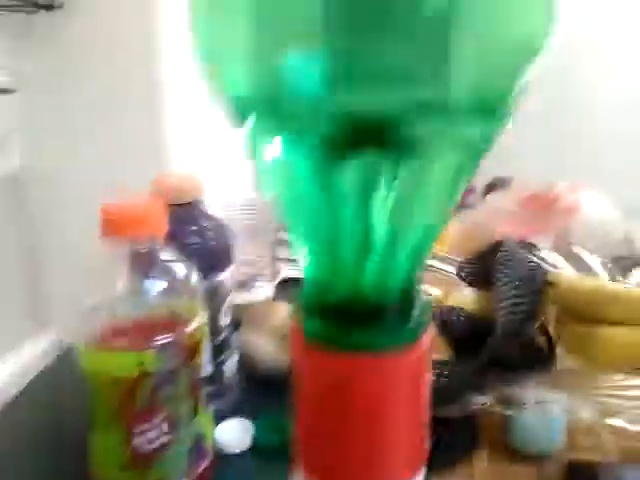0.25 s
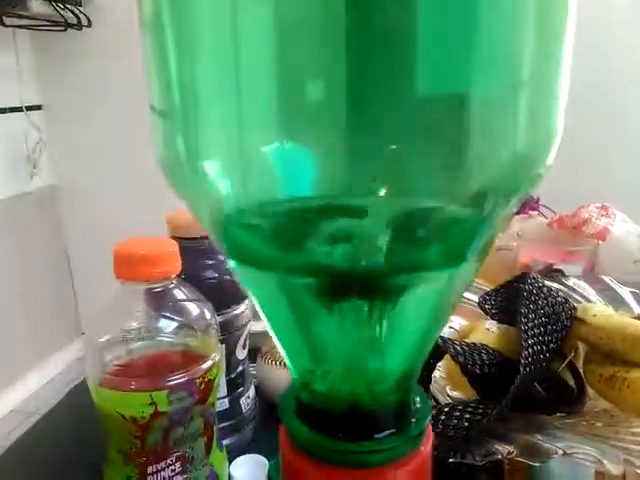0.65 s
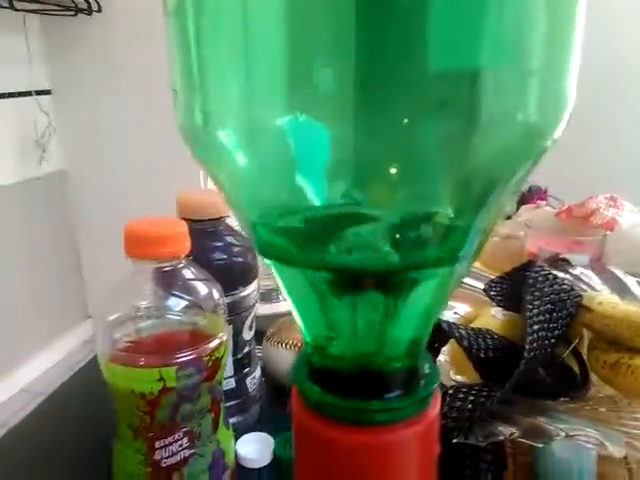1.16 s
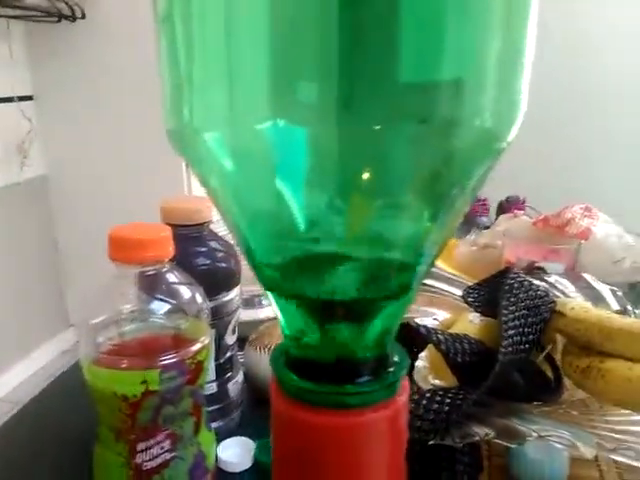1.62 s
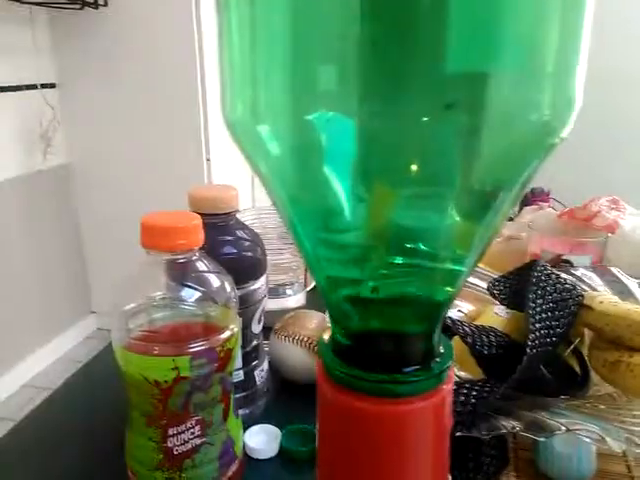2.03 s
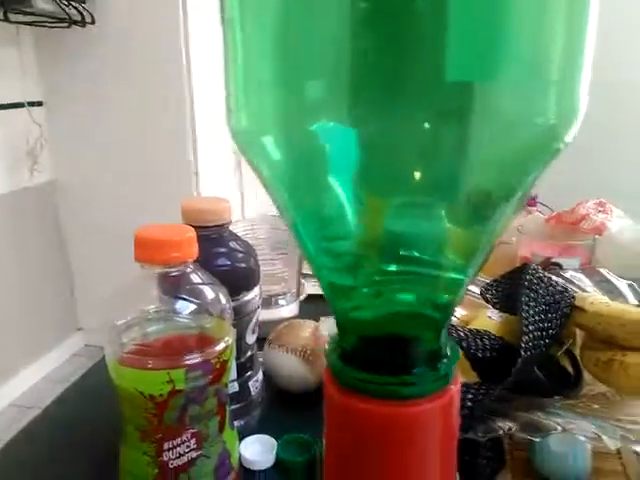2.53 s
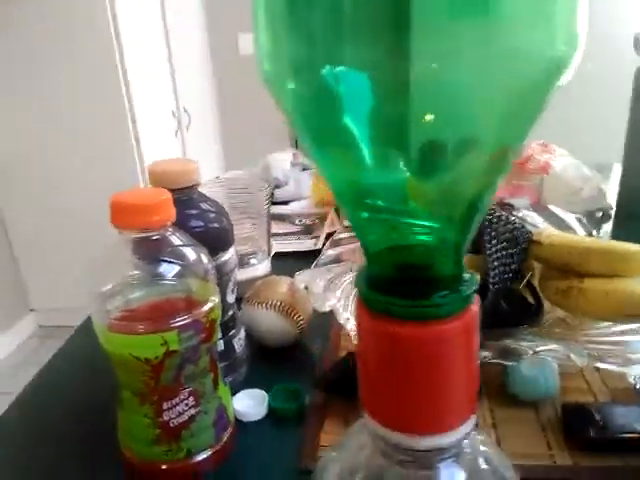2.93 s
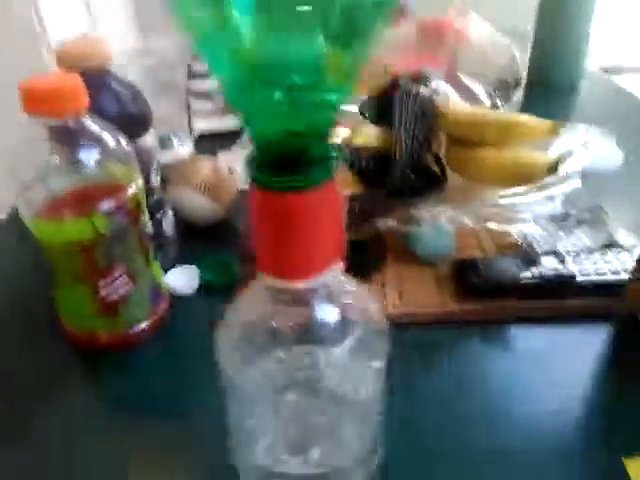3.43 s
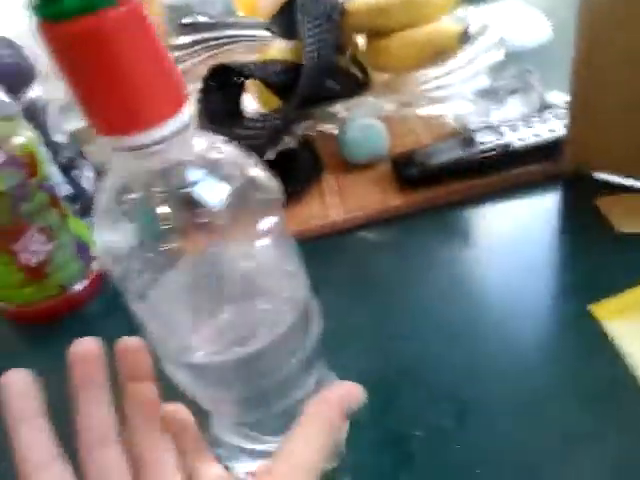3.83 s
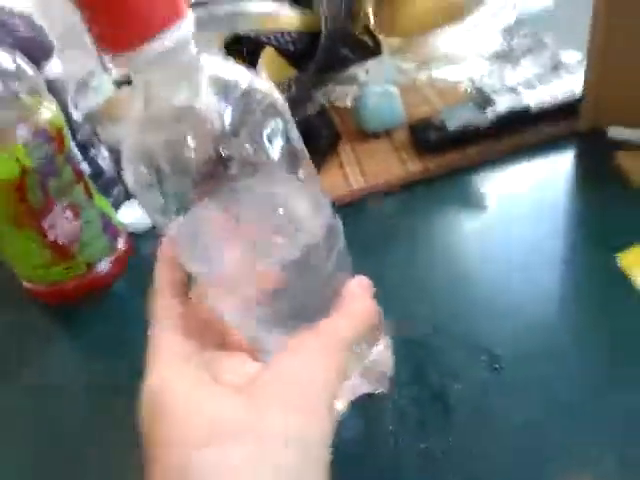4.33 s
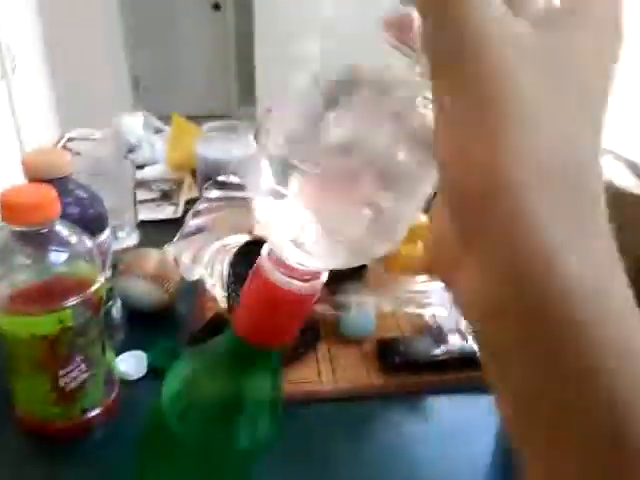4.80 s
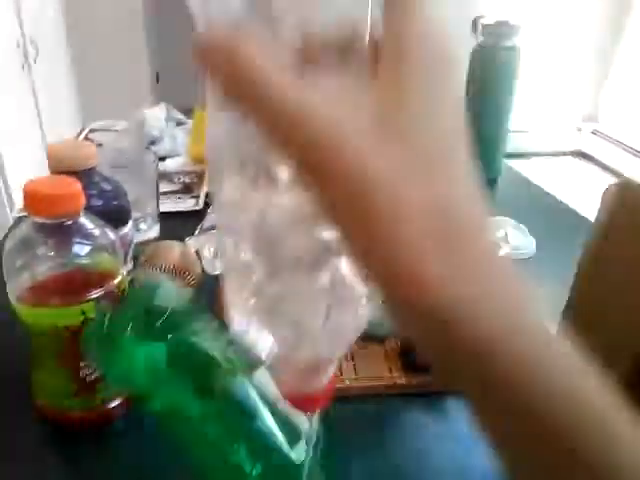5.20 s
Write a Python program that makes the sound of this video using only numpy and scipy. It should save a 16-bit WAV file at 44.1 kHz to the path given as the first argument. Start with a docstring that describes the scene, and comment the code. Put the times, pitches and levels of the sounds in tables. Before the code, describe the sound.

Close stereo sound in a small room: the last water drains between two plastic bottles in irregular bubbly plinks and sharp little drips over a thinning trickle. It dies to near silence with soft rubbing, a low microphone bump and faint crinkles. Then the tipped bottles hit the table with a loud hollow thud, rattle quickly and bounce again while water sloshes.

```python
"""Water draining between bottles, then a fall

The last water swirls through a connector from one plastic bottle into another: trapped bubbles plink as
rising, dying sines, drops tick as bursts of wall modes and the trickle is a cloud of tiny resonances.
The pair is tipped, with rubbing, crinkling and swaying water, and topples onto a table: noise bursts and
decaying modes make a hollow thud, a crack and ringing bounces, while filtered grains slosh and splash.
A small room answers with diffuse echoes, over room tone, a low rumble and a faint mains hum."""
import sys
import numpy as np
from scipy import signal
from scipy.fft import rfft, irfft, next_fast_len
from scipy.io import wavfile

SR = 44100
rng = np.random.default_rng(int(sys.argv[2]) if len(sys.argv) > 2 else 0)


def wav_record(signal):
    """Record a signal, one row per channel, as 16-bit PCM in the file named by sys.argv[1]."""
    frames = np.transpose(np.atleast_2d(signal))
    bounded = np.clip(frames, -1, 1)
    # unit amplitude maps onto the largest positive 16-bit level
    quanta = np.round(bounded * 32767).astype(np.int16)
    wavfile.write(sys.argv[1], SR, quanta)


N = 240948
TIME = np.arange(N) / SR  # s

# Many levels are relative: the functions that play them may add trims.

# dwindling stream: start_s, gurgle_db, spray_db
STREAM_LEVELS = [(0.0, -50, -51.5), (0.23, -63, -55), (0.52, -71, -66.5), (0.89, -63, -57.5),
                 (1.08, -56, -63), (1.86, -68, -63), (2.1, -62, -60), (2.28, -71.5, -62), (2.55, -82, -83)]
# spectrum of the gurgling bubbles: frequency_hz, density_db (per Hz)
GURGLE_SPECTRUM = [(250, -6), (550, -23), (850, 17.5), (1450, -1), (1800, 3.5), (3000, 15.5), (4200, -43),
                   (7000, -47)]
# spectrum of the fine spray: frequency_hz, density_db (per Hz)
SPRAY_SPECTRUM = [(2200, -7.5), (3600, -5), (4200, -13), (5500, 3), (6600, -7), (7700, -2.5), (8800, -4),
                  (10100, -11), (14000, -10)]
# air resonances in the lower bottle: frequency_hz, level_db, t60_s
AIR_MODES = [(300, -8, .2), (494, -20, .15), (865, 4, 0.089), (1003, 8, 0.046), (1188, 4.5, 0.04),
             (1450, -16, 0.024), (1483, 6, 0.057), (1900, 0, 0.041), (2390, -7, 0.072), (2910, -10, 0.18)]


def draining(spatter_db=-5, cavity_db=-46):
    """Cavity resonance: bubbles and drops excite the air of the lower bottle, over a fine trickle."""
    gurgle, spray = gains(STREAM_LEVELS)
    plinks = bubbles() + ticks(drops(), level_db=-0.5, t60=0.025, width=0.063, snap_db=-15.5)
    air = sum(from_db(db + cavity_db) * ring(plinks, hz, t60) for hz, db, t60 in AIR_MODES)
    gurgling = fizz(per_s=350, size_db=2.0, low_hz=428.7, high_hz=4106, cycles=97)
    spraying = fizz(per_s=450, size_db=4.5, low_hz=3460, high_hz=13960, cycles=55)
    spatter = grains(per_s=570, size_db=0.0)
    trickle = gurgle * coloured(gurgling, GURGLE_SPECTRUM)
    trickle += spray * coloured(spraying, SPRAY_SPECTRUM)
    trickle += from_db(spatter_db) * spray * coloured(spatter, SPRAY_SPECTRUM)
    walls = [(300, -12.5), (1400, -8.5), (3000, -16), (4000, -5.5), (5400, -14.5), (12000, -6)]
    return plinks + air + trickle + echo(plinks + trickle, walls, low_t60=0.4, high_t60=0.43)


# bubbles trapped in the pool: start_s, level_db, pitch_hz (at onset), splat_db (re the bubble)
BUBBLE_EVENTS = [(0.01, -40.5, 1850, 4.5), (0.049, -40, 1113, -14), (0.087, -31.5, 3360, -5),
                 (0.109, -33, 1020, -8), (0.131, -31.5, 2370, -3), (0.181, -39, 1036, -3),
                 (0.317, -42.5, 1430, -2), (0.383, -39.5, 1500, -6), (0.429, -40.5, 1180, -10),
                 (0.486, -39, 1780, -8), (0.575, -34, 1460, -18), (0.62, -27, 2965, -4),
                 (0.682, -31.5, 1845, -7), (0.768, -39.5, 1000, -6), (0.816, -37, 1490, -7),
                 (0.847, -33.5, 1390, -15), (0.898, -41.5, 1450, -8), (1.024, -29, 1590, -5),
                 (1.04, -38.5, 1350, -3), (1.12, -32, 2640, -7.5), (1.154, -38.5, 1406, -3),
                 (1.21, -40, 1430, -2), (1.401, -44, 1210, -12), (1.485, -35.5, 1520, 2.5),
                 (1.535, -32.5, 3160, 1), (1.556, -35.5, 1443, -2), (1.832, -41.5, 3800, -7),
                 (1.894, -37, 1010, -14), (1.94, -50, 873, 7), (2.02, -31.5, 1470, -6),
                 (2.074, -33, 1150, -25), (2.167, -36, 3110, -14), (2.222, -48.5, 856, 3),
                 (2.272, -38, 875, -20), (2.814, -61, 906, 6)]
SINGLE_DRIPS_S = 1.88  # from here on the bubbles come as single drips, without droplets of their own
BUBBLE_T60_S = 0.021


def bubbles(level_db=-1, droplet_splat_db=-5, splat_t60=0.016, side_db=-6,
            satellite_db=-14, scatter_octaves=0.394, satellite_s=0.016):
    """Bubble resonance: a drop splats and traps ringing air; fainter satellites follow at other pitches."""
    out, t = np.zeros((2, N)), np.arange(SR // 10) / SR
    splashing = [row for row in BUBBLE_EVENTS if row[0] < SINGLE_DRIPS_S]
    droplets = fallback(splashing, count=1, low_hz=1195, high_hz=3340,
                        soonest_s=0.00302, latest_s=0.035, weaker_db=7, spread_db=2.5)
    for s, db, hz, splat_db in list(BUBBLE_EVENTS) + [(*row, droplet_splat_db) for row in droplets]:
        gain = from_db(db + level_db) * pan(side_db)
        # the broad, dull splat loses its depth as the stream thins to single drips
        depth_hz = np.interp(s, [1.5, SINGLE_DRIPS_S], [220, 850])
        skirts = signal.butter(1, [hz * 0.55, hz * 1.64], "band", fs=SR, output="sos")
        noise = rng.standard_normal((2, len(t))) * fade(t, splat_t60)
        splat = band(signal.sosfilt(skirts, noise), depth_hz, 4700)
        splat = from_db(splat_db) * splat / abs(splat).max()
        add(out, s, gain * (plink(t, hz, BUBBLE_T60_S) + splat))
        # three satellites
        for late, octaves in zip(rng.random(3), rng.standard_normal(3).clip(-2, 2)):
            satellite = plink(t, hz * 2 ** (scatter_octaves * octaves), BUBBLE_T60_S)
            add(out, s + late * satellite_s, gain * from_db(satellite_db) * satellite)
    return nearer_right(out)


def plink(t, hz, t60, rise_per_s=3.6, attack_s=0.0012):
    """Bubble near a surface: a dying note whose pitch climbs as it nears the surface; peak 1."""
    cycles = hz * (t + rise_per_s * t * t / 2)
    note = np.sin(2 * np.pi * cycles) * fade(t, t60) * (1 - np.exp(-t / attack_s))
    return note / abs(note).max()


# drops on the thin wall: start_s, level_db, pitch_hz
DROP_EVENTS = [(0.0395, -40, 6260), (0.192, -40.5, 4620), (0.227, -33.5, 5530), (0.3002, -43.5, 5840),
               (0.3853, -39.5, 4850), (0.5177, -45, 7600), (0.5941, -35.5, 8200), (0.6467, -35.5, 5070),
               (0.7356, -37.5, 5000), (0.8415, -30, 7860), (0.899, -38, 5730), (0.9911, -34.5, 5060),
               (1.0231, -37, 7460), (1.2705, -41.5, 4270), (1.3068, -39, 5290), (1.3435, -39.5, 5700),
               (1.4346, -33.5, 5820), (1.5802, -37.5, 5620), (1.6354, -41, 5530), (1.737, -40, 4560),
               (1.7954, -40, 5580), (1.9667, -36.5, 7640), (2.003, -41, 6200), (2.125, -45, 6000),
               (2.2779, -37.5, 5580), (2.3384, -42, 5830), (2.407, -41.5, 7390), (2.4361, -40.5, 5100),
               (2.6803, -45.5, 5050)]
# each wall mode radiates its own way: pitch_hz, left_right_db
WALL_DIRECTIONS = [(4800, -1.5), (5650, 7), (7400, -8.5)]


def drops():
    """Modal radiation: drops and droplets placed by pitch, as start_s, level_db, pitch_hz, left_right_db."""
    droplets = fallback(DROP_EVENTS, count=1, low_hz=5020, high_hz=9200,
                        soonest_s=0.0036, latest_s=0.03, weaker_db=9.5, spread_db=6)
    return [(s, db, hz, at_hz(WALL_DIRECTIONS, hz)) for s, db, hz in list(DROP_EVENTS) + droplets]


def fallback(parents, count, low_hz, high_hz, soonest_s, latest_s, weaker_db, spread_db):
    """Ballistic droplets fall back a moment later at any pitch, as start_s, level_db, pitch_hz."""
    s, db = np.repeat(np.array(parents)[:, :2], count, axis=0).T
    late, size, pitch = rng.random((len(s), 3)).T
    start_s = s + soonest_s + (latest_s - soonest_s) * late
    level_db = db - weaker_db + spread_db * (2 * size - 1)
    return list(zip(start_s, level_db, low_hz * (high_hz / low_hz) ** pitch))


def ticks(rows, level_db, t60, width, snap_db):
    """Impact excitation: each tap shakes a narrow cluster of wall modes and gives a broad snap."""
    out, t = np.zeros((2, N)), np.arange(SR // 20) / SR
    for s, db, hz, side_db in rows:
        push = rng.standard_normal((2, len(t))) * fade(t, t60)
        cluster = band(push, hz / (1 + width), hz * (1 + width))
        snap = band(push, 1950, 8600)
        sound = cluster / cluster.std(axis=1, keepdims=True) + from_db(snap_db) * rms_one(snap)
        add(out, s, from_db(db + level_db) * pan(side_db) * sound / abs(sound.mean(axis=0)).max())
    return out


# air gulping up through the connector: start_s, level_db
GULP_EVENTS = [(.11, -51), (.31, -51), (1.024, -44.5), (1.5, -50.5)]


def gulps(low_hz=230, high_hz=760, t60=0.081, attack_s=0.003):
    """Band-limited transient: each gulp of air is a soft, dull thud in the water."""
    out, t = np.zeros((2, N)), np.arange(SR // 6) / SR
    for s, db in GULP_EVENTS:
        push = rng.standard_normal(len(t)) * fade(t, t60) * (1 - np.exp(-t / attack_s))
        thud = band(push, low_hz, high_hz)
        add(out, s, from_db(db) * thud / abs(thud).max())
    return nearer_right(out)


# low drone while the water runs: start_s, end_s, pitch_hz, level_db
DRONE_SPAN = (0.8, 2, 74.5, -63.5)


def drone(width=0.11):
    """Narrow-band noise: a soft low drone that swells and fades while the water runs."""
    start, end, hz, db = DRONE_SPAN
    gate = np.interp(TIME, [start - 0.3, start, end, end + 0.15], [0, 1, 1, 0])
    noise = band(rng.standard_normal(N), hz / (1 + width), hz * (1 + width))
    return from_db(db) * gate * rms_one(noise)


# plastic ticking as it is handled: start_s, level_db, pitch_hz, left_right_db
CRINKLE_EVENTS = [(2.927, -48.5, 14400, 3), (3.483, -54, 5300, 5), (4.2268, -45.5, 4780, 30),
                  (4.2872, -55, 1870, 1), (4.4504, -54.5, 5300, 9), (4.49, -55.5, 3400, 8),
                  (4.6357, -44.5, 4930, 3), (4.775, -37.5, 4900, 3)]
# water swaying in the tilted bottle: start_s, level_db
SWAY_LEVELS = [(3.3, -89), (3.344, -88), (3.908, -76), (3.926, -67.5), (4.14, -74), (4.75, -74)]
# spectrum of the swaying water: frequency_hz, density_db (per Hz)
SWAY_SPECTRUM = [(400, -12), (930, -4), (1060, 9.5), (1250, -4), (1850, -4), (3800, -16.5), (5200, -15),
                 (7000, -21), (14000, -44)]
# spectrum of the rubbing fingers: frequency_hz, density_db (per Hz)
RUB_SPECTRUM = [(140, -11), (290, 3), (420, -6.5), (520, -3.5), (900, -19.5), (3000, -44)]


def handling(sway_db=-1):
    """Friction and sloshing: fingers rub, the plastic ticks and water sways as the hand tilts the bottles."""
    crinkle = ticks(CRINKLE_EVENTS, level_db=-3.0, t60=0.013, width=0.16, snap_db=-11)
    sway_gain = from_db(sway_db) * gains(SWAY_LEVELS)[0] + toppling()
    sway = sway_gain * coloured(grains(per_s=4300, size_db=-3.5), SWAY_SPECTRUM)
    rub = gripping() * coloured(rng.standard_normal((2, N)), RUB_SPECTRUM)
    room = [(1000, 3.0), (6000, -2), (12000, -1)]
    return crinkle + sway + rub + echo(crinkle, room, low_t60=0.3, high_t60=0.3)


def toppling(rush_s=0.086, start_db=-70.5, rise_db=17):
    """Exponential growth: gain of the water rushing ever louder up to the first blow."""
    fallen = 1 + (TIME - BLOW_EVENTS[0][0]) / rush_s
    return ((fallen > 0) & (fallen < 1)) * from_db(start_db + rise_db * np.clip(fallen, 0, 1))


# the hand shifting the hollow bottles: start_s, end_s, level_db
GRIP_SPANS = [(0, 0.346, -69), (2.723, 4.85, -76.5)]


def gripping(holding_db=-79, fade_s=0.13, uneven_db=2.5):
    """Amplitude modulation: gain of rubbing, faint while the hand holds, louder while it shifts, uneven."""
    moves = 0
    for start, end, db in GRIP_SPANS:
        moves = moves + from_db(db) * np.interp(TIME, [start - fade_s, start, end, end + fade_s], [0, 1, 1, 0])
    uneven = np.interp(TIME, np.arange(90) / 15, rng.standard_normal(90))  # 15 knots a second
    return (from_db(holding_db) + moves) * from_db(uneven_db * uneven)


# finger sliding on the wall: start_s, end_s, pitch_hz, level_db
SQUEAK_SPAN = (3.92, 4.05, 1075, -69)


def squeak(width=0.05, fade_s=0.02):
    """Friction-driven resonance: a sliding finger sings near the bottle's hollow note, as narrow noise."""
    start, end, hz, db = SQUEAK_SPAN
    gate = np.interp(TIME, [start - fade_s, start, end, end + fade_s], [0, 1, 1, 0])
    noise = band(rng.standard_normal((2, N)), hz / (1 + width), hz * (1 + width))
    return from_db(db) * gate * rms_one(noise)


# water thrown about after the fall: start_s, slosh_db, spray_db
SLOSH_LEVELS = [(4.88, -59, -41), (5.0, -34, -43.5), (5.08, -32, -46.5), (5.2, -38.5, -48), (5.3, -41, -36),
                (5.46, -40, -40)]
# spectrum of the slosh: frequency_hz, density_db (per Hz)
SLOSH_SPECTRUM = [(65, -5), (115, -7), (170, -10), (280, -5), (500, -1.5), (760, -15), (1030, 6.5),
                  (1250, -11), (1700, -2.5), (2400, -18), (3400, -32), (6000, -55)]
# spectrum of the thrown spray: frequency_hz, density_db (per Hz)
SLOSH_SPRAY_SPECTRUM = [(1760, -57), (3000, -12.5), (5200, -13.5), (7500, -33), (14000, -39)]


def falling(slosh_db=-2, spray_db=-2, crackle_db=-5):
    """Impact and reverberation: blows, chatter, crackling plastic and splashes, the room answering."""
    slosh, spray = gains(SLOSH_LEVELS)
    sloshing = fizz(per_s=1800, size_db=-0.5, low_hz=108.3, high_hz=3460, cycles=34)
    water = from_db(slosh_db) * slosh * coloured(sloshing, SLOSH_SPECTRUM)
    water += from_db(spray_db) * spray * coloured(grains(per_s=4900, size_db=-1.0), SLOSH_SPRAY_SPECTRUM)
    plastic = [(700, -4), (1800, 0), (5500, -2), (8000, -12), (13000, -22)]
    crackle = from_db(crackle_db) * spray * coloured(grains(per_s=160, size_db=6.5), plastic)
    knocks = blows() + chatter() + crackle
    room = [(120, -14.5), (400, -4), (1100, -9.0), (3000, -9), (6000, -9.5), (12000, -8.0)]
    return knocks + water + echo(knocks, room, low_t60=1.0, high_t60=0.43)


# blows of the falling bottles: start_s, ring_db, ring_hz, thump_db, wall_db, crack_db
BLOW_EVENTS = [(4.854, -6.5, 962, -28.5, -16.5, -21.5), (5.217, -13, 1110, -40, -22, -10.5),
               (5.299, 0.5, 1081, -47, -25, -26.5), (5.362, 0, 1024, -38.5, -20, -30),
               (5.445, -7.5, 1018, -51, -24.5, -26.5)]
# spectrum of a blow before its own force is added: frequency_hz, level_db
BLOW_SPECTRUM = [(70, -10), (120, 15.5), (175, 2.5), (250, 7.5), (500, 8.5), (700, -17), (1100, 1.5),
                 (2100, 0.5), (3200, -8.5), (4300, -8), (5700, -2.5), (7500, -17), (10000, -17),
                 (14500, -30)]
# modes of the bottle and the table under it: frequency_hz, level_db, t60_s
BODY_MODES = [(126, 7.5, 0.13), (226.2, 12.5, 0.18), (278.3, 5, 0.36), (292.8, 4, .43), (400, -6, .3),
              (421, -20, 0.39), (467.6, -1, 0.39), (552, -9, 0.31)]
HOLLOW_T60_S, PARTNER_T60_S = 0.055, 0.03


def blows(thump_db=39, wall_db=36, crack_db=29, snap_db=7, snap_t60=0.012,
          ring_db=-7.5, modes_db=-5, rebound_db=-15.5, rebound_s=0.009):
    """Modal impact: each blow snaps and crumples the wall and rings the hollow bottle and the table."""
    out, hollow, t = np.zeros((2, N)), np.zeros((2, N)), np.arange(SR // 2) / SR
    for s, db, hz, thump, wall, crack in BLOW_EVENTS:
        force = [(350, thump + thump_db), (1200, wall + wall_db), (2400, wall + wall_db), (4500, crack + crack_db)]
        colour = [(f, level + at_hz(force, f)) for f, level in BLOW_SPECTRUM]
        add(out, s, burst(colour, low_t60=0.059, high_t60=0.047, seconds=0.42))
        snap = band(rng.standard_normal((2, len(t))) * fade(t, snap_t60), 4860, 6700)
        add(out, s + 0.001007, from_db(crack + snap_db) * snap / abs(snap).max() * pan(1.6))
        # the hollow note is a close pair of wall modes that beat; a rebound strikes it again
        note = np.sin(2 * np.pi * hz * t) * fade(t, HOLLOW_T60_S)
        note += 0.65 * np.sin(2 * np.pi * hz * 0.943 * t) * fade(t, PARTNER_T60_S)
        add(hollow, s, from_db(db + ring_db) * pan(-3.5) * note)
        add(hollow, s + rebound_s, from_db(db + rebound_db) * pan(-7) * note)
        lows = 0
        for k, (f, level, t60) in enumerate(BODY_MODES):
            sign = (-1) ** k  # neighbouring modes start in opposite phase
            lows = lows + sign * from_db(level) * np.sin(2 * np.pi * f * t) * fade(t, t60)
        add(out, s, from_db(thump + modes_db) * lows)
    return out + nearer_right(hollow)


# lone taps between the last blows: start_s, tick_db, clack_db
TAP_EVENTS = [(5.345, -17.5, -23.5), (5.4284, -18, -24)]


def chatter(bright_db=-1, dull_db=7, knock_db=-3, t60=0.038):
    """Repeated impact: the bottle skitters in quick taps of a tick, a wall clack and a small hollow knock."""
    out, t = np.zeros((2, N)), np.arange(SR // 20) / SR
    for s, db, dull in bounces() + list(TAP_EVENTS):
        push = rng.standard_normal((2, len(t))) * fade(t, t60)
        tick = band(push, 2200, 5800)
        clack = band(push, 1050, 2470) * pan(-7)
        knock = band(push[0], 280, 543)
        for part, level in ((tick, db + bright_db), (clack, dull + dull_db), (knock, dull + knock_db)):
            add(out, s, from_db(level) * part / abs(part).max())
    return out


# gaps shrink from the first towards a steady rattle, by this ratio per bounce
FIRST_GAP_S, RATTLE_GAP_S, GAP_SHRINK = 0.0645, 0.0205, 0.43
# first bounce, before the trims of chatter; loss per bounce
TICK_DB, TICK_LOSS_DB, CLACK_DB, CLACK_LOSS_DB = -30.5, 0.5, -23, 1.3


def bounces(count=12):
    """Inelastic bouncing: each sooner and weaker than the last, as start_s, tick_db, clack_db."""
    k = np.arange(count)
    gaps = RATTLE_GAP_S + (FIRST_GAP_S - RATTLE_GAP_S) * GAP_SHRINK ** k
    start_s = BLOW_EVENTS[0][0] + np.cumsum(gaps)
    return list(zip(start_s, TICK_DB - TICK_LOSS_DB * k, CLACK_DB - CLACK_LOSS_DB * k))


# hum partials at the first multiples of 120 Hz: level_db (rms)
HUM_LEVELS = [-62, -77, -79]
# the hand bumping the microphone: start_s (centre), level_db
BUMP_EVENTS = [(3.15, -51.5), (3.28, -55)]
# spectrum of the rumble: frequency_hz, density_db (per Hz)
RUMBLE_SPECTRUM = [(8, -17), (25, 12), (55, 2), (75, -7), (130, -30), (500, -94)]
# spectrum of the room tone: frequency_hz, density_db (per Hz)
ROOM_SPECTRUM = [(60, -3.5), (300, -18.5), (450, -28.5), (700, -24.5), (1200, -33.5), (3000, -35),
                 (14000, -40)]


def background(tone_db=-66, rumble_db=-60, hum_db=1, waver_db=1.4, swell_db=3.5, bump_s=0.049):
    """Stationary noise and harmonics: room tone, microphone rumble and hum, its upper partials wavering most."""
    swell, *wavers = (np.interp(TIME, np.arange(90) / 15, knots) for knots in rng.standard_normal((4, 90)))
    hum = 0
    for k, (db, waver) in enumerate(zip(HUM_LEVELS, wavers), 1):
        partial = np.sqrt(2) * np.sin(2 * np.pi * (120 * k * TIME + rng.random()))
        hum = hum + from_db(db + hum_db + k * waver_db * waver) * partial
    bumps = sum(from_db(db) * np.exp(-((TIME - s) / bump_s) ** 2) for s, db in BUMP_EVENTS)
    rumble_gain = from_db(rumble_db + swell_db * swell) + bumps
    rumble = rumble_gain * coloured(rng.standard_normal((2, N)), RUMBLE_SPECTRUM)
    tone = from_db(tone_db) * coloured(rng.standard_normal((2, N)), ROOM_SPECTRUM)
    return hum + rumble + tone


def echo(x, spectrum, low_t60, high_t60):
    """Diffuse reverberation: convolution with reflections that build up over a few milliseconds."""
    tail = burst(spectrum, low_t60, high_t60, seconds=1)
    tail = tail * (1 - np.exp(-np.arange(tail.shape[1]) / SR / 0.0015))
    return signal.fftconvolve(x.sum(axis=0, keepdims=True) / 2, tail, axes=1)[:, :N]


def burst(spectrum, low_t60, high_t60, seconds):
    """High modal density: decaying noise in third-octave bands, each with its own decay time."""
    t, out = np.arange(int(seconds * SR)) / SR, 0
    half_band = 2 ** (1 / 6)
    for hz in 63 * 2 ** (np.arange(25) / 3):
        t60 = at_hz([(200, low_t60), (8000, high_t60)], hz)
        raw = band(rng.standard_normal((2, len(t))) * fade(t, t60), hz / half_band, hz * half_band)
        mid, side = raw / np.linalg.norm(raw, axis=1, keepdims=True)
        # a wider band holds more energy
        out = out + spread(mid, side, hz) * from_db(at_hz(spectrum, hz)) * np.sqrt(hz / SR / 2)
    return out


def fizz(per_s, size_db, low_hz, high_hz, cycles):
    """Resonator cloud: clumps of small bubbles, each ringing at one of 28 pitches; t60 in cycles."""
    clumps = from_db(5 * np.interp(TIME, np.arange(200) / 35, rng.standard_normal(200)))
    clicks = grains(per_s * clumps, size_db)
    dealt = rng.integers(0, 28, N)
    pitches = np.geomspace(low_hz, min(high_hz, 16000), 28)
    return sum(hz * ring(clicks * (dealt == k), hz, cycles / hz) for k, hz in enumerate(pitches))


def grains(per_s, size_db):
    """Random impulse process: tiny water impacts of uneven size, as two raw click trains."""
    sizes = from_db(size_db * np.minimum(rng.exponential(1, N), 4))
    return sizes * (rng.random(N) < per_s / SR) * rng.standard_normal((2, N))


def coloured(pair, spectrum):
    """Spectral shaping: give two raw signals a spectrum and a stereo image; rms 1."""
    size = next_fast_len(N)
    hz = np.arange(size // 2 + 1) * SR / size
    shaped = spread(*rfft(pair, size), hz) * from_db(at_hz(spectrum, hz))
    return rms_one(irfft(shaped, size)[:, :N])


# likeness of the two microphones: frequency_hz, correlation (-1 to 1)
MIC_LIKENESS = [(30, .6), (110, .98), (300, .94), (640, .6), (1400, .15), (3000, -.1), (7000, .1)]
# balance of the two microphones: frequency_hz, left_right_db
MIC_BALANCE = [(40, -10), (200, 7.5), (600, -1), (1200, -1.5), (2400, -5.5), (5000, 8), (8000, -3),
               (13000, -12)]


def spread(mid, side, hz):
    """Interchannel coherence: mid and side are weighted by how alike the microphones hear each pitch."""
    alike = np.clip(at_hz(MIC_LIKENESS, hz), -0.99, 0.99)
    opposed = side * np.array([[1], [-1]])
    return (np.sqrt(1 + alike) * mid + np.sqrt(1 - alike) * opposed) * pan(at_hz(MIC_BALANCE, hz))


def nearer_right(x, left_lag_s=0.00012):
    """Time-of-arrival difference: the bottles are nearer the right microphone, so the left lags."""
    return np.array([np.interp(TIME - left_lag_s, TIME, x[0]), x[1]])


def pan(db):
    """Constant-power law: left and right gains for a left-right difference in dB."""
    g = from_db(np.array([[0.5], [-0.5]]) * db)
    return g / np.sqrt(np.mean(g ** 2, axis=0))


def ring(x, hz, t60):
    """Two-pole resonator: a unit click sets a decaying sine of height 1 ringing."""
    r, w = fade(1 / SR, t60), 2 * np.pi * hz / SR
    return signal.lfilter([0, np.sin(w)], [1, -2 * r * np.cos(w), r * r], x + 1e-18)


def band(x, low_hz, high_hz):
    """Causal band-pass filtering."""
    edges = [low_hz, min(high_hz, SR / 2 - 1000)]
    return signal.sosfilt(signal.butter(2, edges, "band", fs=SR, output="sos"), x)


def fade(t, t60):
    """Exponential decay: down 60 dB after t60 seconds."""
    return np.exp(-np.log(1000) * t / max(t60, 1e-4))


def gains(rows):
    """Level curves, linear in dB, as gains; silent outside their span."""
    s, *columns = np.transpose(rows)
    gate = np.interp(TIME, [s[0] - 0.02, s[0], s[-1], s[-1] + 0.02], [0, 1, 1, 0])
    return [gate * from_db(np.interp(TIME, s, c)) for c in columns]


def at_hz(points, hz):
    """Logarithmic pitch scale: read a curve on a log-frequency axis."""
    f, value = np.transpose(points)
    return np.interp(np.log(np.maximum(hz, 1)), np.log(f), value)


def from_db(db):
    """Decibel law: level to amplitude gain."""
    return 10 ** (np.asarray(db) / 20)


def rms_one(x):
    """Effective value: scale to unit rms."""
    return x / np.sqrt(np.mean(x ** 2) + 1e-20)


def add(out, s, sound):
    """Superposition: mix a sound in at time s."""
    i = int(np.clip(s * SR, 0, N - 1))
    out[:, i:i + sound.shape[-1]] += sound[..., :N - i]


def scene():
    """Superposition of draining, tilting and the fall, over the room's own sound."""
    return draining() + drone() + handling() + falling() + background() + gulps() + squeak()


def record(dry, cutoff_hz=14600):
    """Soft saturation rounds the peaks and a steep low-pass cuts the top."""
    rounded = 1.2 * np.tanh(dry / 1.2)
    return signal.sosfilt(signal.ellip(10, 0.3, 70, cutoff_hz, fs=SR, output="sos"), rounded)


dry = scene()
out = record(dry)
wav_record(out)
```